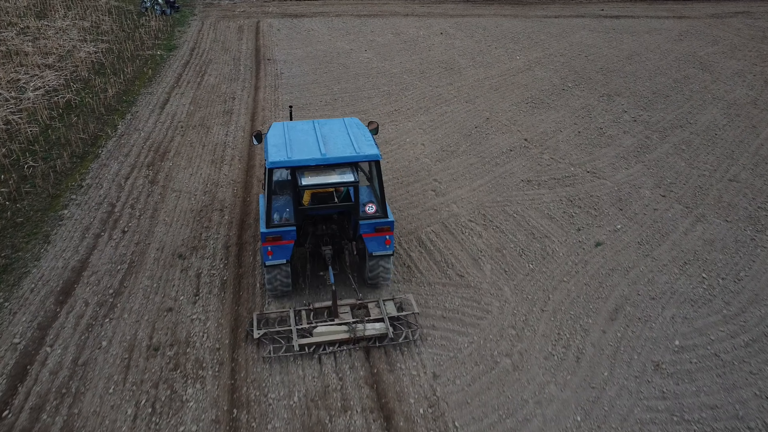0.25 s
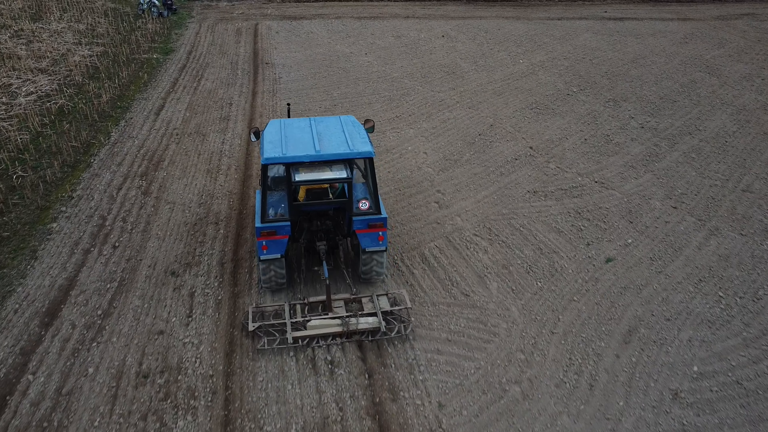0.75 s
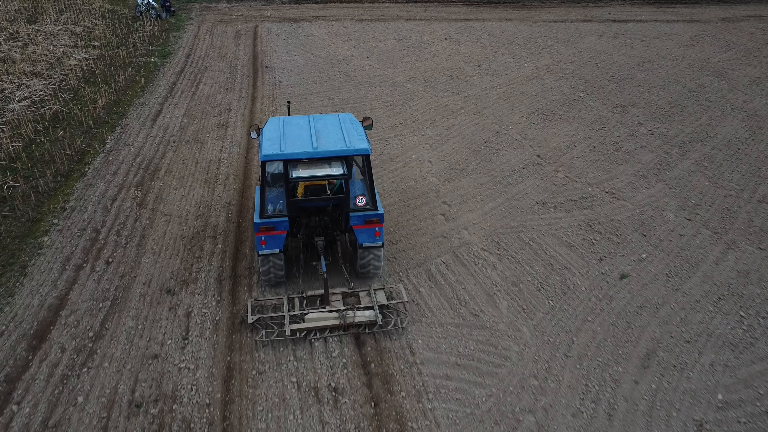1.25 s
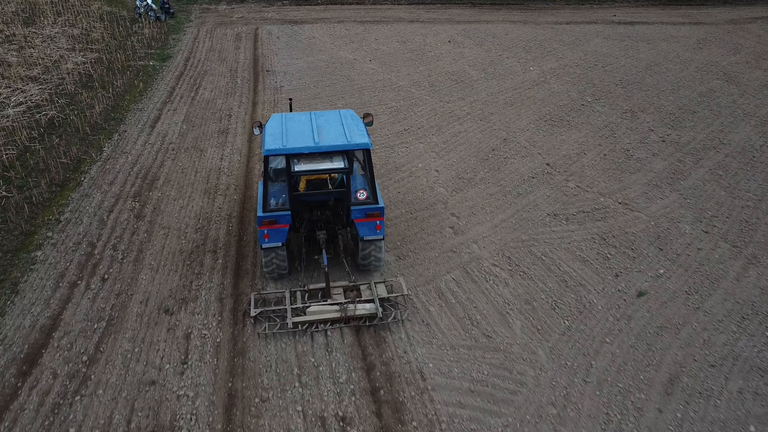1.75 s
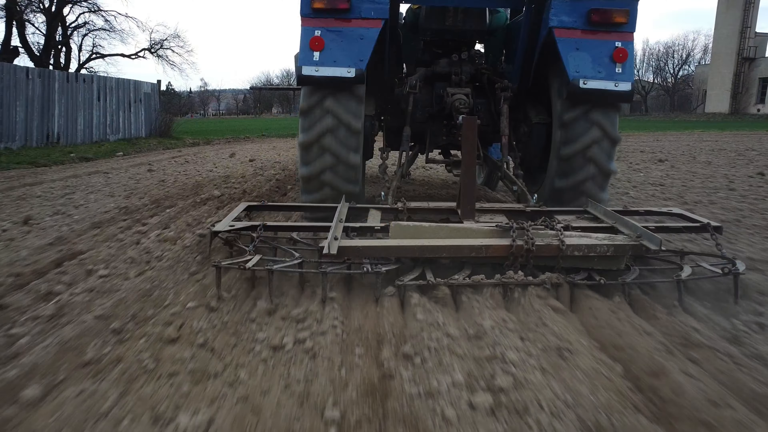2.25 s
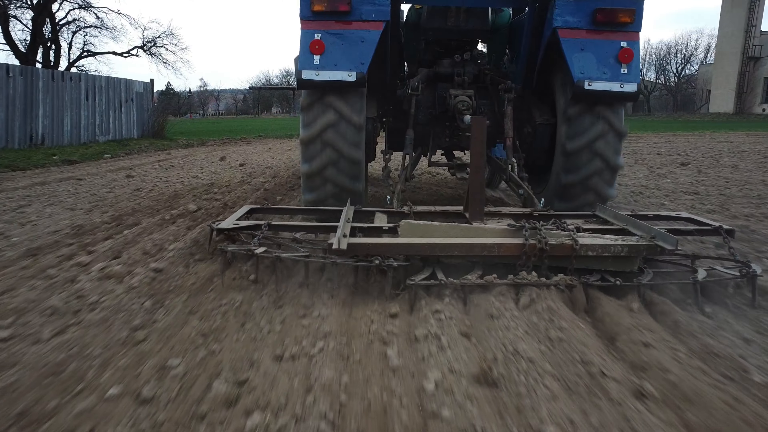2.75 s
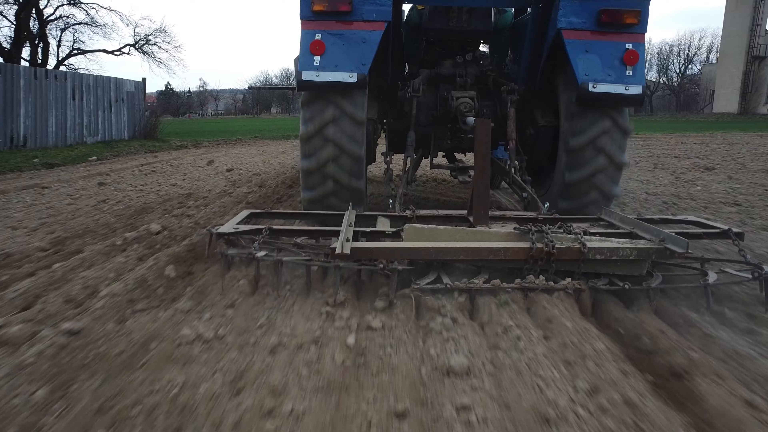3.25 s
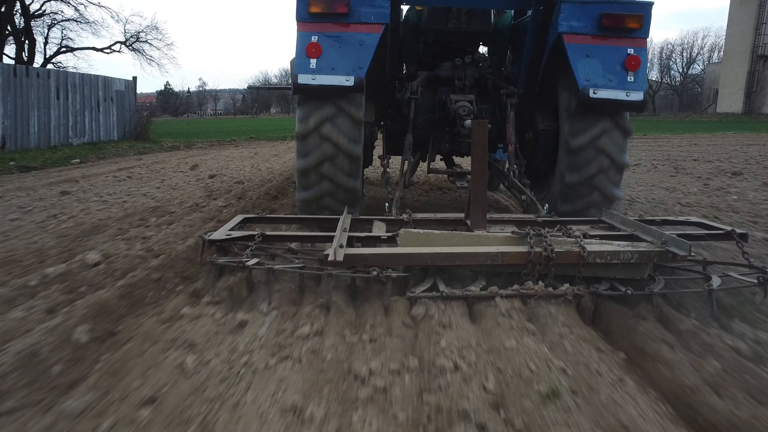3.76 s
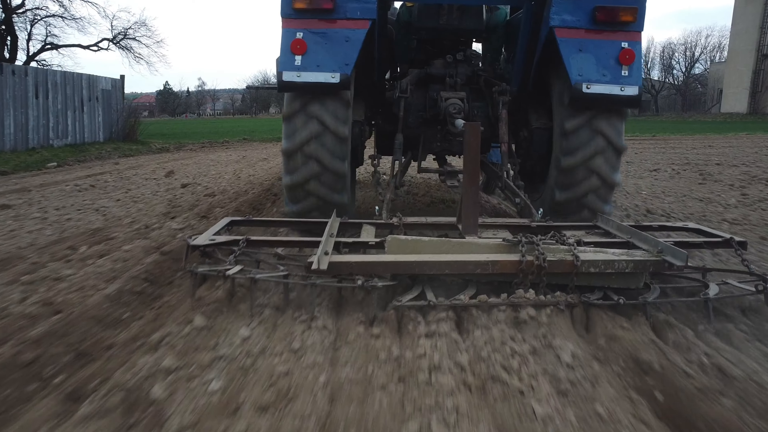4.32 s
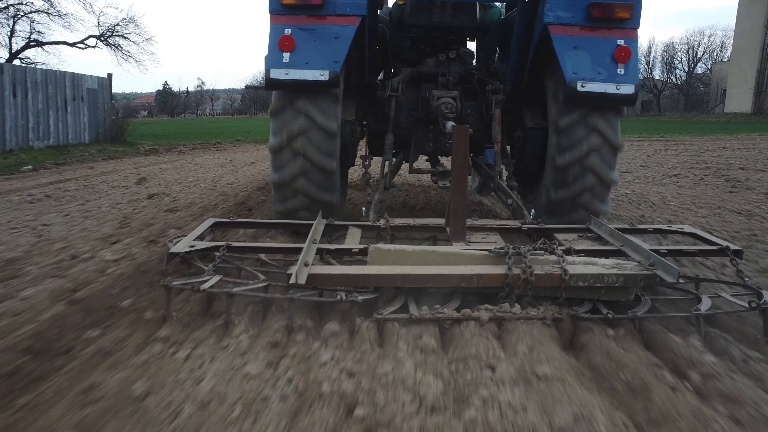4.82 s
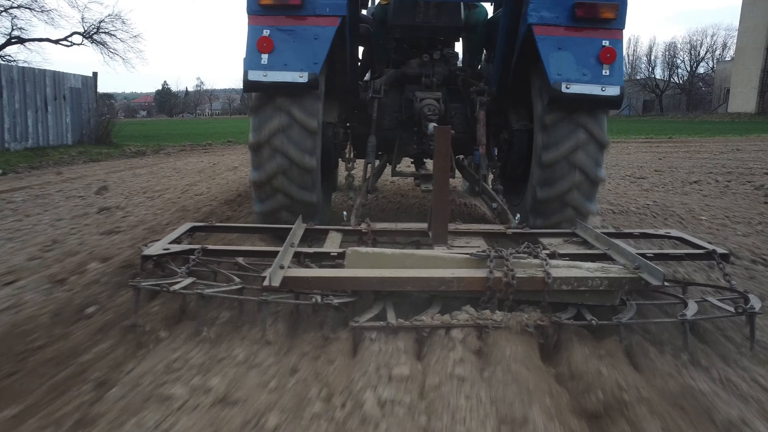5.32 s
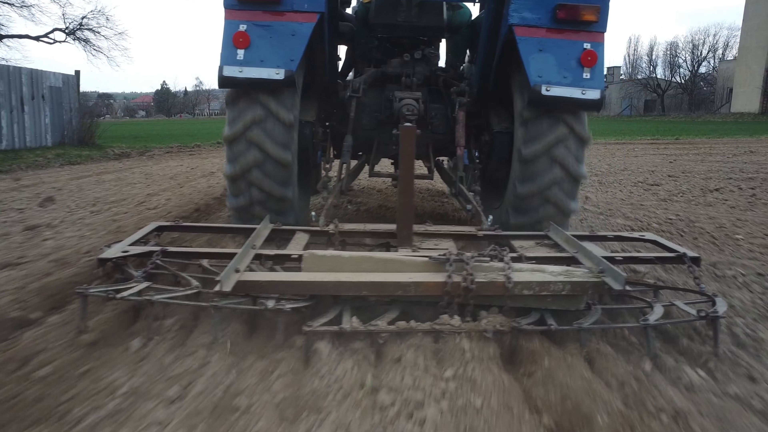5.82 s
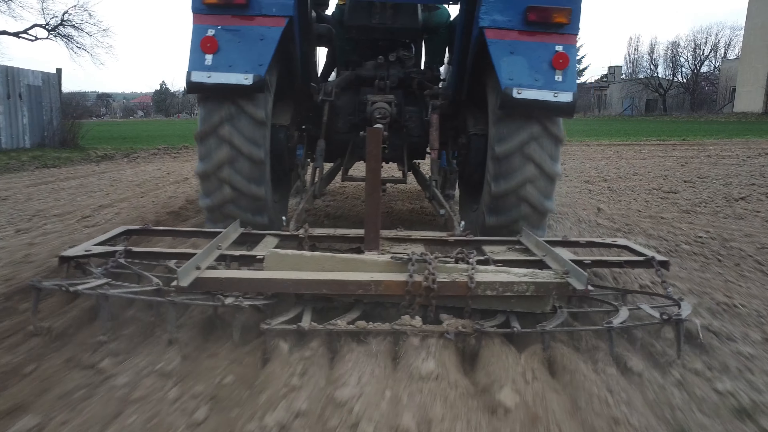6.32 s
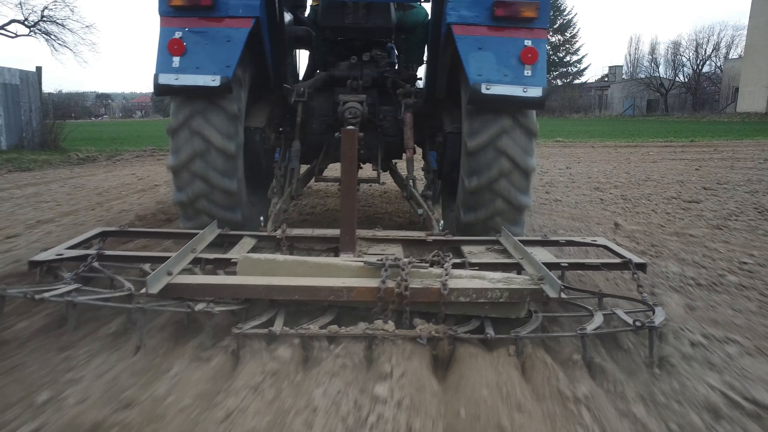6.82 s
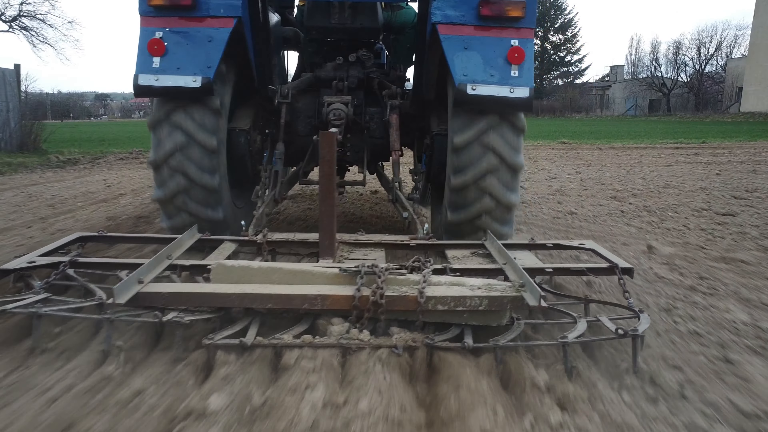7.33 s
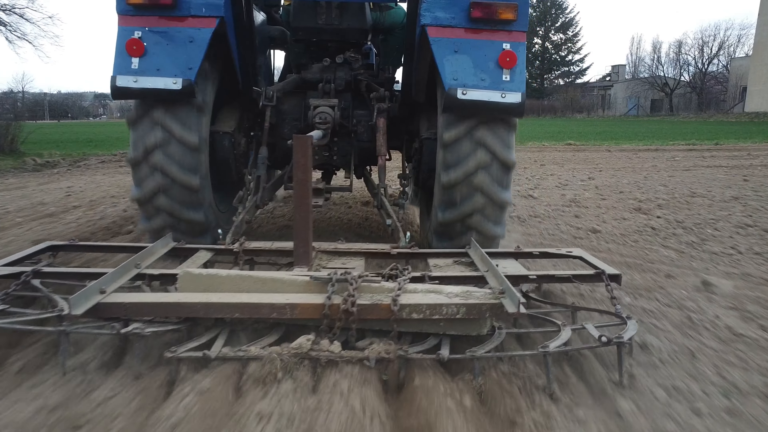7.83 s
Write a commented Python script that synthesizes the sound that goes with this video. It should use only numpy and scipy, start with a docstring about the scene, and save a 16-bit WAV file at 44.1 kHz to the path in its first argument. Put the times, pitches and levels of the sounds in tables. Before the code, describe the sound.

A steady tractor engine under load, heard in two views. First loud and harsh, a low exhaust note with fast metallic chatter and sharp steel knocks, most of them around one and a half seconds. At two seconds it switches instantly to a softer, duller rumble with swelling low hum, light chain rattle, small pings and gritty scraping of soil. Open field, moving stereo microphone, little echo.

```python
"""A four-cylinder diesel tractor drags harrows over tilled soil; the listener rides along.
For the first two seconds, from high behind the cab, the exhaust drones in multiples of the firing rate and
each firing sets the steelwork clattering. Then the view cuts to low behind the harrows: the drone is softer,
cab panels boom now and then on one multiple, and the tines scrape and hiss as noise shaped by the steel and soil.
In both views loose steel knocks and pings, and parts chatter for a moment at their own pitch."""
import sys
import numpy as np
from scipy import signal
from scipy.fft import rfft, irfft, next_fast_len
from scipy.io import wavfile
from scipy.ndimage import uniform_filter1d, map_coordinates

SR = 44100
rng = np.random.default_rng(int(sys.argv[2]) if len(sys.argv) > 2 else 0)


def write(x):
    x = np.atleast_2d(x).T
    wavfile.write(sys.argv[1], SR, np.round(np.clip(x, -1, 1) * 32767).astype(np.int16))

N = 356328
TIME = np.arange(N) / SR  # seconds
SIZE = next_fast_len(N + SR // 2)  # transform length, with room for ringing
HZ = np.fft.rfftfreq(SIZE, 1 / SR)
VIEW_CUT_S = 2.014
TOP_HZ = 15650

# Engine speed, sagging under load: [time_s, firings_per_s]
ENGINE_SPEED = [(0, 45.5), (.42, 46.3), (.75, 45.35), (1.05, 46.2), (1.37, 44.4), (1.6, 46.15),
                (2.3, 45.65), (2.55, 44.4), (3.65, 44.0), (3.9, 42.1), (4.3, 42.25), (4.6, 43.8),
                (5.5, 44.2), (5.85, 43.65), (6.15, 45.0), (6.42, 43.4), (6.65, 44.4), (7, 44.0),
                (7.35, 45.0), (8.08, 43.6)]
# Engine drone in each view: [multiple of the firing rate, level_db (rms)]
HIGH_ORDERS = [(1, -36.5), (1.25, -51), (1.75, -42), (2, -28.5), (2.25, -52), (3, -44.5), (3.25, -46.5),
               (3.75, -44.5), (4, -41.5), (4.25, -40.5), (4.75, -47), (7.75, -61)]
LOW_ORDERS = [(1, -43), (1.25, -60), (1.75, -56.5), (2.5, -73), (2.75, -58.5), (3.75, -73), (4, -56),
              (4.25, -48.5), (4.75, -49.5), (5, -62), (7.75, -66.5)]
# Colour of the exhaust and chassis rumble: [pitch_hz, relative level_db]
HIGH_RUMBLE = [(25, -22), (45, -30), (70, -12), (100, -6), (150, -12.5), (195, -3.5), (235, -4.5),
               (290, -29), (450, -50)]
LOW_RUMBLE = [(25, -24), (45, -7), (70, -5), (120, 5), (155, 1), (195, -1.5), (220, -2), (260, -17),
              (400, -21)]
# Resonances of the steelwork and microphone housing: [pitch_hz, width_hz, relative level_db]
HIGH_MODES = [(358, 27, -6.5), (492, 27, -6.5), (820, 50, -5.5), (1236, 250, -6.5), (1430, 51, 0),
              (1772, 55, 0), (2128, 97, -7.5), (2454, 180, -10), (3024, 148, -15.5), (3207, 21, -11.5),
              (3570, 110, -14.5), (4004, 110, -12.5), (4324, 150, -13.5), (5250, 50, -16),
              (5710, 220, -18.5), (6340, 21, -17), (7120, 47, -17.5), (8200, 65, -27), (8640, 77, -16),
              (9460, 70, -20), (10260, 140, -18)]
LOW_MODES = [(348.5, 87, -5.5), (496, 29, -11.5), (577, 30, -8.5), (967, 155, -4), (1281, 71, -2),
             (1448, 28, -0.5), (1560, 60, -2.5), (1720, 52, -2), (2053, 66, 0), (2334, 83, -2.5),
             (2690, 43, -2.5), (2890, 85, -6), (3050, 21, -4), (3680, 18, -6), (4282, 14, -6),
             (5100, 22, -25), (5980, 23, -17), (5880, 23, -17.5), (6927, 47, -13), (8440, 32, -15),
             (8650, 61, -20.5), (9200, 180, -26), (10140, 130, -26), (11040, 41, -30)]
# Broad response between the resonances: [pitch_hz, relative level_db]
HIGH_BASE = [(250, -15.5), (700, -9.5), (1900, -42), (3300, -31), (5000, -24), (8000, -30), (11000, -26),
             (15000, -41)]
LOW_BASE = [(250, -5.5), (700, -72), (1900, -40), (3300, -10.5), (5000, -24), (8000, -28.5), (11000, -35),
            (15000, -68)]
# Likeness of left and right: [pitch_hz, likeness (1 = the same)]
HIGH_ALIKE = [(250, 0.9), (700, 1), (1400, 0.64), (2400, 0.89), (3000, 0.43), (5000, 0.84), (6500, 0.96),
              (7600, 0.97), (8500, 0.84), (9500, 0.99)]
LOW_ALIKE = [(300, 0.93), (600, 0.94), (1400, 0.9), (3000, 0.9), (5200, 0.83), (7000, 0.97), (10000, 1)]
# Left level minus right level: [pitch_hz, difference_db]
HIGH_BALANCE = [(100, -.5), (135, -1.5), (250, -1), (550, -2), (1000, -8.5), (1500, -8.5), (2300, -2.5),
                (3000, -4.5), (4500, -4.5), (5400, -1), (7600, 0), (8600, -3.5), (13000, -6.5)]
LOW_BALANCE = [(220, 0), (280, .5), (1000, -1.5), (1500, -.7), (2500, -.3), (4200, 1), (5400, 2.3),
               (6800, 0)]
# Phase by which left leads right: [pitch_hz, lead_rad]
HIGH_LEAD = [(50, -0.32), (200, -0.18), (500, -0.45), (850, -1.17), (1150, 0.063), (1400, -0.51),
             (1700, 0.57), (2800, -0.45), (3400, 0.43), (4300, -0.69), (5000, 1.6), (6000, 0)]
LOW_LEAD = [(45, -0.23), (100, -0.043), (220, -0.13), (320, -0.072), (800, -0.14), (1100, .15), (3600, .18),
            (6000, 0)]
# Loose steel knocks in the hitch and harrow frame: [start_s, relative level_db, typical pitch_hz]
KNOCKS = [(0.0678, -17, 1770), (0.1554, -20, 1726), (0.2433, -27, 1730), (0.393, -19, 1800),
          (0.764, -16, 1730), (0.9648, -19, 1480), (0.984, -11.5, 1440), (1.4482, -9, 1430),
          (1.4704, -6.5, 1770), (1.5125, -13, 1800), (1.7295, -13.5, 1770), (2.063, -24.5, 3010),
          (2.1291, -24.5, 2350), (2.174, -27, 2350), (2.2174, -24, 1540), (2.2616, -27, 2070),
          (2.4389, -26, 2650), (2.7072, -28.5, 1460), (3.523, -27, 2050), (3.7983, -23.5, 1950),
          (3.8906, -28, 2650), (3.9384, -26, 1960), (3.962, -24.5, 2300), (4.0821, -29, 2340),
          (4.127, -25.5, 2650), (4.1758, -24, 2360), (4.2687, -31, 2340), (4.4084, -25, 3000),
          (4.5022, -23.5, 1535), (4.5481, -23.5, 2350), (4.5884, -27.5, 2900), (5.5478, -28, 2370),
          (5.7294, -29, 1710), (5.8224, -31, 1990), (5.9135, -33, 1390), (5.9576, -26.5, 2000),
          (6.0464, -29, 2870), (6.361, -30.5, 1980), (6.4552, -34, 1460), (6.5086, -26.5, 2800)]
# Chattering chains and tines: [start_s, length_s, pitch_hz, relative width_hz, relative level_db]
CHATTER = [(.575, 0.022, 10400, 500, -34), (2.027, 0.2, 3030, 700, -43.5), (2.378, .055, 4700, 130, -51),
           (3.95, 0.32, 2710, 600, -46), (4.405, 0.034, 5450, 2500, -41.5), (4.95, 0.3, 2170, 150, -47),
           (5.932, 0.2, 2800, 500, -44.5), (6.02, 0.056, 4530, 250, -52), (6.483, 0.1, 2750, 350, -42.5),
           (7.688, 0.12, 1990, 150, -46), (7.86, 0.26, 2050, 170, -43.5)]
# Cab booms on the third multiple: [middle_s, length_s, level_db (rms)]
BOOMS = [(2.1, .7, -40), (2.693, .35, -40), (3.226, 0.77, -35.5), (5.31, 0.56, -33.5), (6.182, .45, -40),
         (6.854, .62, -36), (7.387, 0.52, -41), (7.737, 0.54, -34.5)]
# Cab hum on the second multiple, low view: [time_s, level_db (rms)]
HUM = [(2.3, -43.5), (2.85, -47), (3.5, -39.5), (4.65, -46), (5.3, -41), (6, -45.5), (8.08, -42)]
# Running gear when each view starts: level_db of [thud, clatter, scrape], before jolts
HIGH_GEAR_DB = [-35.3, -31.5, -38.6]
LOW_GEAR_DB = [-46, -41.5, -48]
# Steady drift of those levels: db_per_s of [thud, clatter, scrape]
HIGH_DRIFT_DB_PER_S = [.7, 0.48, 2.03]
LOW_DRIFT_DB_PER_S = [-0.87, -0.2342, -0.6]
# Rough ground shakes the rig harder, soft ground less: [middle_s, length_s, change_db before sharing]
JOLTS = [(0.328, 0.47, 3.5), (0.982, 0.5, 3), (1.45, 0.3, 2), (1.855, 0.39, 3.5), (2.204, 0.29, 1.3),
         (2.88, 0.53, 2), (3.386, 0.28, 1.5), (4.51, 0.54, 2.5), (5.802, 2.4, -1.5), (6.037, 0.27, 2.5),
         (6.54, .22, 3), (6.857, 0.35, -2), (7.199, 0.62, 1.5), (7.98, 0.69, 2)]
# Part of each jolt's change that reaches [thud, clatter, scrape], as plain factors
JOLT_SHARE = [.45, 0.75, 1.04]

BOOM_ROUND, BOOM_REST_DB = 0.96, -46  # swell shape (smaller = flatter top), level between booms
TAP_SHARE, TAP_SPREAD_DB, TAP_HZ = 0.4, 1, 2000  # share of engine cycles, scatter, typical pitch


def amp(db):
    """Turn decibels into gain."""
    return 10 ** (np.asarray(db) / 20)


def unit(x):
    """Scale a sound to an rms of 1."""
    return x / np.sqrt(np.mean(x ** 2) + 1e-20)


def unit_norm(response):
    """Rms gain of a frequency response."""
    return np.sqrt(np.mean(abs(response) ** 2))


def along(points):
    """Join (pitch, value) points with straight lines on a logarithmic pitch axis."""
    hz, value = np.transpose(points)
    return np.interp(np.log(HZ + 1), np.log(hz + 1), value)


def curves(rows):
    """Draw a value for every sample from each column after the time."""
    s, *columns = np.transpose(rows)
    return [np.interp(TIME, s, column) for column in columns]


def arch(middle, length):
    """A half-cosine hump that is zero outside its length."""
    return np.cos(np.pi * np.clip((TIME - middle) / length, -.5, .5))


def wobble(rate):
    """A smooth random curve with this many random points a second."""
    points = rng.standard_normal(int(N * rate / SR) + 4)
    return map_coordinates(points, [TIME * rate])


def filtered(x, response):
    """Shape a sound by a frequency response."""
    return irfft(rfft(x, SIZE) * response, SIZE)[..., :N]


def below(edge_hz):
    """Gain of a steep low-pass, one half at its edge."""
    return 1 / (1 + (HZ / edge_hz) ** 16)


def resonance(hz, width_hz):
    """Response of one ringing part: strongest at its own pitch, ringing only after it is struck."""
    return 1j * HZ * width_hz / (hz ** 2 - HZ ** 2 + 1j * HZ * width_hz)


def body(modes, base, low_hz):
    """Response of many resonances over a broad base, ringing only after the blow."""
    power = amp(along(base)) ** 2
    for hz, width, db in modes:
        power = power + abs(amp(db) * resonance(hz, width)) ** 2
    gain = np.sqrt(power) * (1 - below(low_hz))
    # Folding the cepstrum (transform of the log gain) gives the phase that rings soonest.
    cepstrum = irfft(np.log(gain + 1e-4), SIZE)
    cepstrum[1:SIZE // 2] *= 2
    cepstrum[SIZE // 2 + 1:] = 0
    return np.exp(rfft(cepstrum))


def ring(force, response, alike, patchy_db):
    """Noisy contact, as strong as the force and patchy in time and pitch, rings the steel body."""
    noise = signal.stft(rng.standard_normal((2, N)), nperseg=256)[2]
    field = uniform_filter1d(rng.standard_normal(noise.shape[1:]), size=6, axis=0)
    field = uniform_filter1d(field, size=7, axis=1)
    patchy_noise = noise * amp(patchy_db * unit(field))
    contact = unit(signal.istft(patchy_noise, nperseg=256)[1][:, :N])
    # Less likeness turns more of the sound from the middle to the sides.
    turn = np.arccos(np.clip(along(alike), 0, 1)) / 2
    spread = np.array([np.cos(turn), np.sin(turn)])
    mid, side = filtered(force * contact, response / unit_norm(response) * spread)
    return np.array([mid + side, mid - side])


def blows(times, sizes, rise, t60):
    """Envelope of blows that swell quickly and die away (rise and t60 in s); their energies add."""
    t = np.arange(SR // 5) / SR
    shape = (1 - np.exp(-t / rise)) * amp(-60 * t / t60)
    starts = np.clip(times * SR, 0, N).astype(int)
    train = np.bincount(starts, sizes ** 2, N + 1)
    energy = signal.fftconvolve(train, (shape / shape.max()) ** 2)[:N]
    return np.sqrt(abs(energy))


def ports(pair, balance, lead):
    """Sound reaches the two microphone ports at different levels and phases."""
    sides = np.array([[.5], [-.5]])
    lean = amp(sides * along(balance))
    phase = np.exp(1j * sides * along(lead))
    return filtered(pair, lean / lean.mean(axis=0) * phase)


def soil_hiss(level_db):
    """Fine earth streams evenly off the tines: steady noise, strongest near 6 kHz."""
    colour = along([(2000, -16), (6000, 3), (10000, -15), (15000, -12)])
    return amp(level_db) * unit(filtered(rng.standard_normal(N), amp(colour)))


def rumble(spectrum, level_db, patchy_db):
    """Uneven combustion and the rolling chassis fill in between the drone's tones with low noise."""
    noise = filtered(rng.standard_normal(N), amp(along(spectrum)) * below(720))
    return amp(level_db) * unit(noise * amp(patchy_db * wobble(12)))


def boom(firings, order, level_db, drift):
    """The cab panels swell in sympathy with one multiple of the firing rate."""
    phase = 2 * np.pi * order * firings + drift * wobble(12)
    return amp(level_db) * unit(np.sin(phase))


def boom_level():
    """Each boom swells in one arch and sinks back to the resting level (dB)."""
    energy = amp(BOOM_REST_DB) ** 2
    for middle, length, db in BOOMS:
        swell = amp(db) * abs(arch(middle, length)) ** BOOM_ROUND
        energy = energy + swell ** 2
    return 10 * np.log10(energy)


def chatter(firings, level_db):
    """A loose part bounces with the engine beat for a moment and rings at its own pitch."""
    force = diesel_force(firings, [0, 0, 0, 0], rebound_db=-5, scatter_db=2.5, steady_db=-20, t60=0.087)
    out = np.zeros(N)
    for start, length, hz, width_hz, db in CHATTER:
        progress = np.clip((TIME - start) / length, 0, 1)
        swell = np.sqrt(abs(np.sin(np.pi * progress)))
        rung = filtered(force * rng.standard_normal(N), resonance(hz, 1.14 * width_hz) ** 2)
        out += amp(db + level_db) * swell * unit(rung)
    return out


def taps(firings, tap_db):
    """In some engine cycles a slack joint taps lightly: rows like the knocks."""
    cycles = np.arange(1, firings[-1], 4)  # four firings make one cycle
    luck, size, pitch = rng.standard_normal((len(cycles), 3)).T
    times = np.interp(cycles, firings, TIME)
    rows = np.column_stack([times, tap_db + TAP_SPREAD_DB * size, TAP_HZ * np.exp(.2 * pitch)])
    return rows[luck < np.quantile(luck, TAP_SHARE)]


def knocks(voice, light, level_db, ping_db, bright_db, t60, ping_t60):
    """Slack joints strike home: the steelwork rings, and each part adds a short ping of its own."""
    rows = np.vstack([KNOCKS, light])
    times, db, _ = rows.T
    t = np.arange(SR // 8) / SR
    pings = np.zeros(N + SR)
    for s, knock_db, hz in rows:
        # Eight tones scattered around the part's pitch
        partials = np.clip(hz * np.exp(.3 * rng.standard_normal((8, 1))), 900, 12000)
        ping = np.sin(2 * np.pi * (partials * t + rng.random((8, 1)))).mean(axis=0)
        fade = amp(knock_db + ping_db - 60 * t / ping_t60) * (1 - np.exp(-t / 0.00072))
        pings[int(s * SR):][:len(t)] += fade * ping
    response, alike = voice
    # Steel on steel has little bass.
    hard = amp(along([(400, -7), (1400, 1), (2500, bright_db / 2), (7000, bright_db), (14000, -2)]))
    force = blows(times, amp(db + level_db), 0.00035, t60)
    return ring(force, response * hard, alike, patchy_db=2.5) + pings[:N]


def grit_force(rate, spread_db, t60):
    """Clods, stones and chain links tick against the steel at random (rate in ticks per s)."""
    chance = rng.random((int(rate * N / SR), 2))
    sizes = amp(spread_db * np.minimum(-np.log(1 - chance[:, 1]), 4))
    return unit(blows(chance[:, 0] * N / SR, sizes, 0.00071, t60))


def gear_levels(start, gear_db, drift_db_per_s):
    """Levels of thud, clatter and scrape: a slow drift, changed by rough or soft ground."""
    jolt_db = sum(db * arch(middle, length) ** 2 for middle, length, db in JOLTS)
    parts = zip(gear_db, drift_db_per_s, JOLT_SHARE)
    return [db + drift * (TIME - start) + share * jolt_db for db, drift, share in parts]


def running_gear(engine, grit, voice, levels, grit_share, patchy_db):
    """The engine shakes the steelwork: an even roar below, clatter above, grit mixed into the treble."""
    engine = unit(engine)
    scrape_force = np.sqrt((1 - grit_share) * engine ** 2 + grit_share * grit ** 2)
    roar = ring(engine ** 0.68, *voice, patchy_db=1.04)  # the power evens out the beats
    clatter = ring(engine, *voice, patchy_db=1.33)
    scrape = ring(scrape_force, *voice, patchy_db)
    low, high = below(900), below(3800)
    bands = [filtered(roar, low), filtered(clatter, high - low), filtered(scrape, 1 - high)]
    return sum(amp(db) * unit(band) for db, band in zip(levels, bands))


def diesel_force(firings, cylinder_db, rebound_db, scatter_db, steady_db, t60):
    """One clack per firing, sized by its cylinder, and a lighter one half a beat later."""
    beats = np.arange(int(2 * firings[-1]))  # two half beats per firing
    chance = rng.standard_normal((len(beats), 2))
    times = np.interp(beats / 2, firings, TIME) + 0.00077 * chance[:, 0]
    cylinder = beats // 2 % len(cylinder_db)
    db = np.array(cylinder_db)[cylinder] + rebound_db * (beats % 2) + scatter_db * chance[:, 1]
    return np.hypot(blows(times, amp(db), 0.00065, t60), amp(steady_db))


def drone(firings, orders, waver_db, drift):
    """Tones at multiples of the firing rate; all but the first and second waver more."""
    out = np.zeros(N)
    for order, db in orders:
        loose = 1 if order in (1, 2) else 3
        phase = 2 * np.pi * (order * firings + rng.random()) + drift * loose * wobble(14)
        out += amp(db) * unit(amp(waver_db * loose * wobble(11)) * np.sin(phase))
    return out


def high_view(firings):
    """Above the cab: strong exhaust note and hard clatter, leaning to the right."""
    voice = body(HIGH_MODES, HIGH_BASE, low_hz=255), HIGH_ALIKE
    engine = diesel_force(firings, [0.94, -1.6, -1.3, 0.51], rebound_db=-17.5, scatter_db=2.2,
                          steady_db=-3.5, t60=0.056)
    grit = grit_force(rate=120, spread_db=1.5, t60=0.037)
    levels = gear_levels(0, HIGH_GEAR_DB, HIGH_DRIFT_DB_PER_S)
    gear = running_gear(engine, grit, voice, levels, grit_share=0.29, patchy_db=2.0)
    bass = drone(firings, HIGH_ORDERS, waver_db=0.6, drift=0.065)
    bass += rumble(HIGH_RUMBLE, level_db=-39.5, patchy_db=-0.5)
    light = taps(firings, tap_db=-22)
    steel = knocks(voice, light, level_db=-10, ping_db=-3, bright_db=2, t60=.035, ping_t60=.04)
    return ports(gear + steel + bass, HIGH_BALANCE, HIGH_LEAD)


def low_view(firings):
    """Behind the harrows: softer drone, booming cab, rattling frame and scraping tines."""
    hollow = 1 - 0.64 * resonance(hz=713, width_hz=100)  # the bounce off the ground weakens one band
    voice = body(LOW_MODES, LOW_BASE, low_hz=262) * hollow, LOW_ALIKE
    engine = diesel_force(firings, [2, -1.5, 1.5, -1], rebound_db=-3, scatter_db=1.5,
                          steady_db=-3, t60=.035)
    grit = grit_force(rate=100, spread_db=2.5, t60=0.035)
    levels = gear_levels(VIEW_CUT_S, LOW_GEAR_DB, LOW_DRIFT_DB_PER_S)
    gear = running_gear(engine, grit, voice, levels, grit_share=0.36, patchy_db=2.0)
    bass = drone(firings, LOW_ORDERS, waver_db=1, drift=.09)
    bass += rumble(LOW_RUMBLE, level_db=-44.5, patchy_db=0)
    hum_db, = curves(HUM)
    cab = boom(firings, order=2, level_db=hum_db, drift=0.11)
    cab += boom(firings, order=3, level_db=boom_level(), drift=0.11)
    light = taps(firings, tap_db=-33.5)
    steel = knocks(voice, light, level_db=-9.3, ping_db=0, bright_db=8, t60=.05, ping_t60=.07)
    return ports(gear + steel + bass + cab + soil_hiss(level_db=-63.0), LOW_BALANCE, LOW_LEAD)


def scene():
    """One engine, heard from two viewpoints in turn, with chatter over both."""
    speed, = curves(ENGINE_SPEED)
    firings = np.cumsum(speed) / SR  # firings counted so far
    fade = np.clip((TIME - VIEW_CUT_S) / 0.0074 + .5, 0, 1)  # a quick 7.4 ms crossfade
    views = (1 - fade) * high_view(firings) + fade * low_view(firings)
    return views + chatter(firings, level_db=-0.5)


def record(dry):
    """The microphone keeps nothing above its band limit."""
    return filtered(dry, HZ < TOP_HZ)


dry = scene()
out = record(dry)
write(out)
```